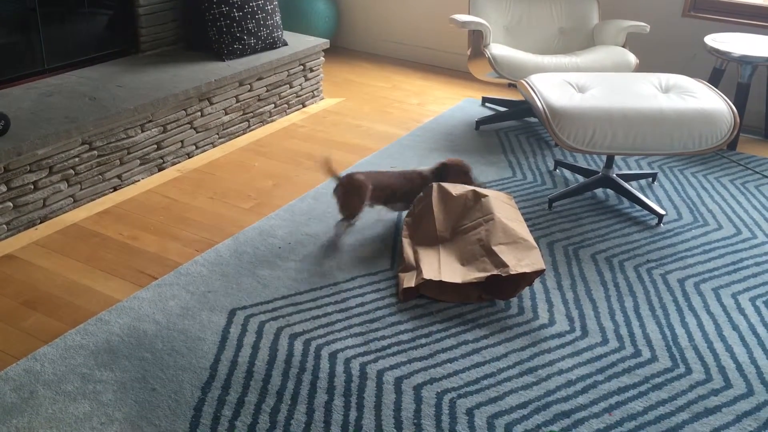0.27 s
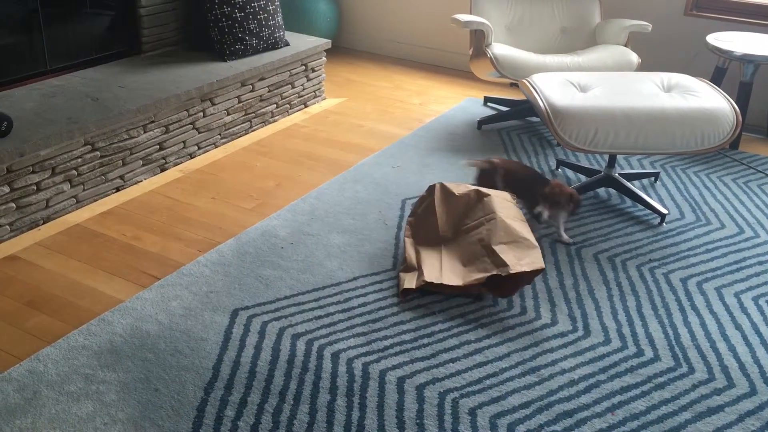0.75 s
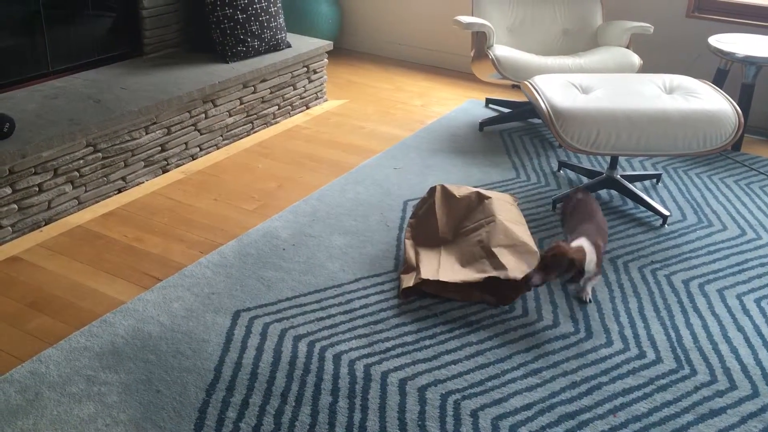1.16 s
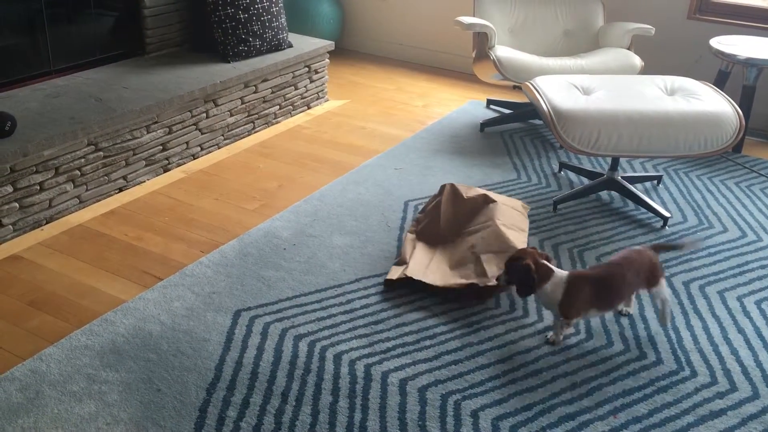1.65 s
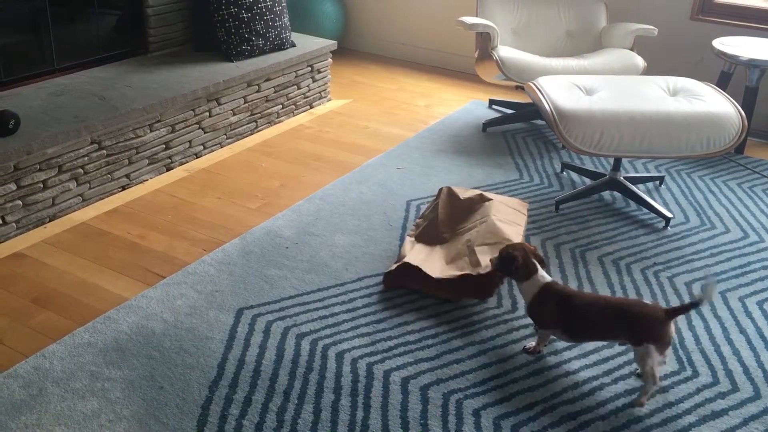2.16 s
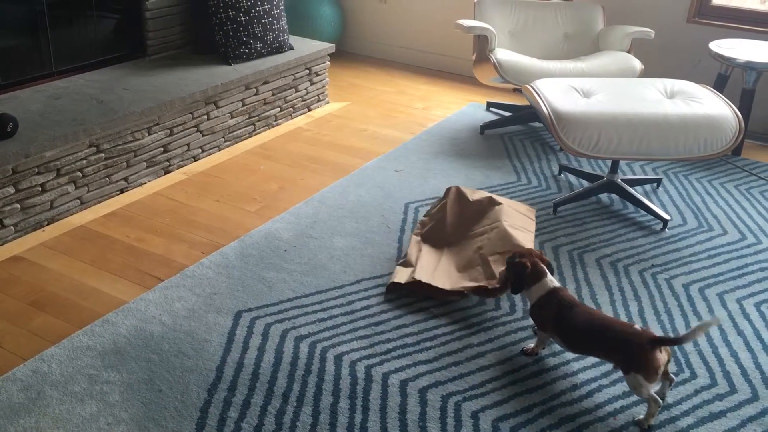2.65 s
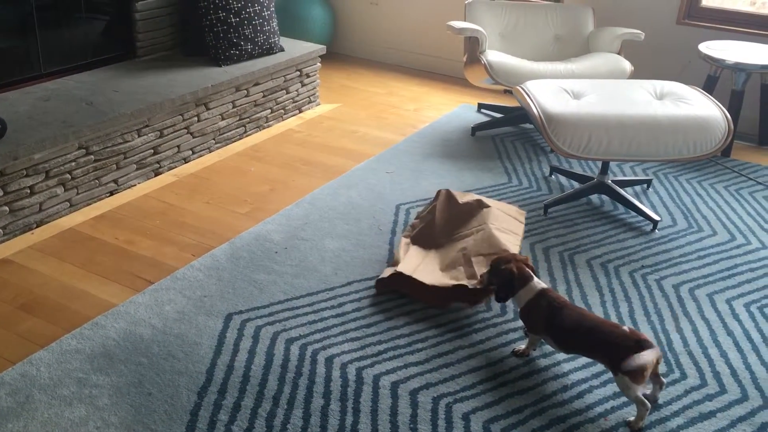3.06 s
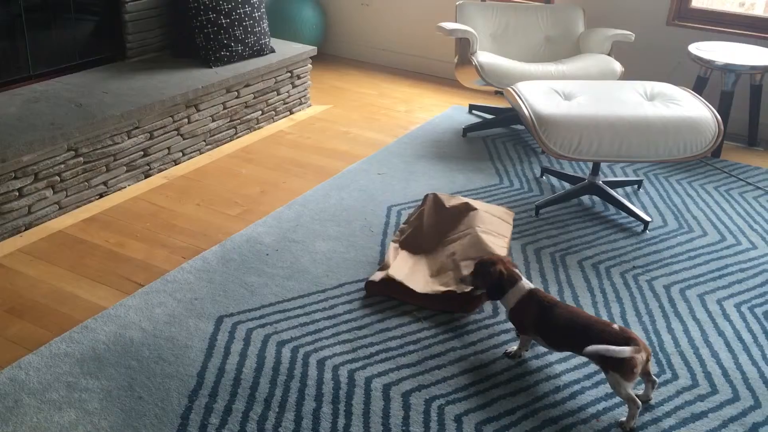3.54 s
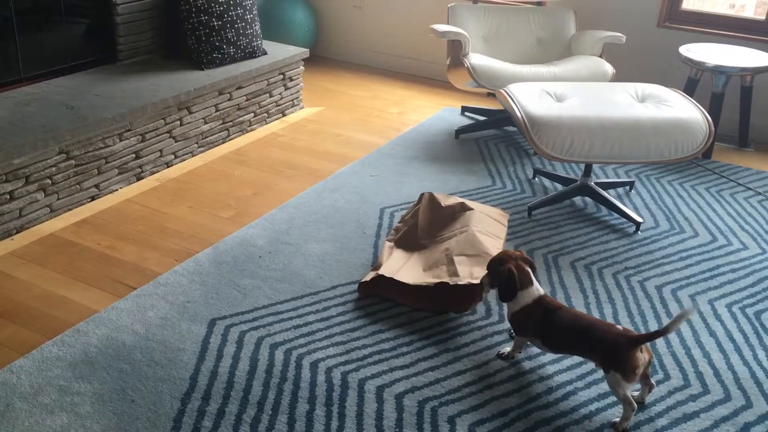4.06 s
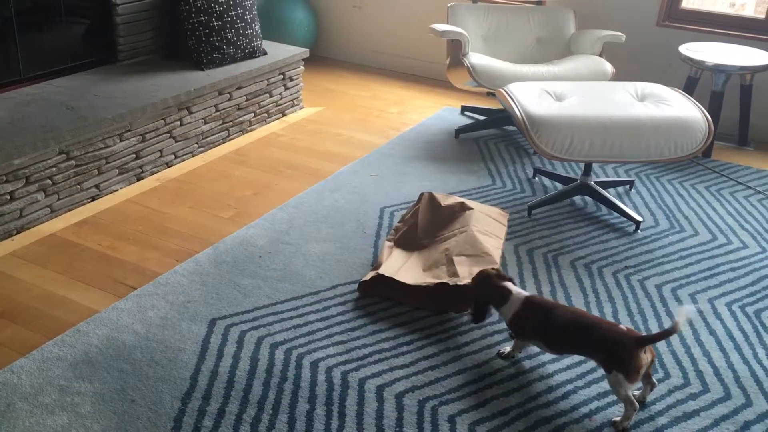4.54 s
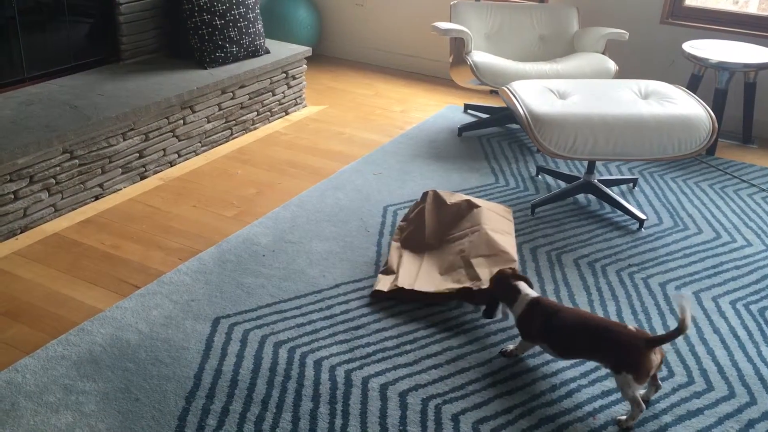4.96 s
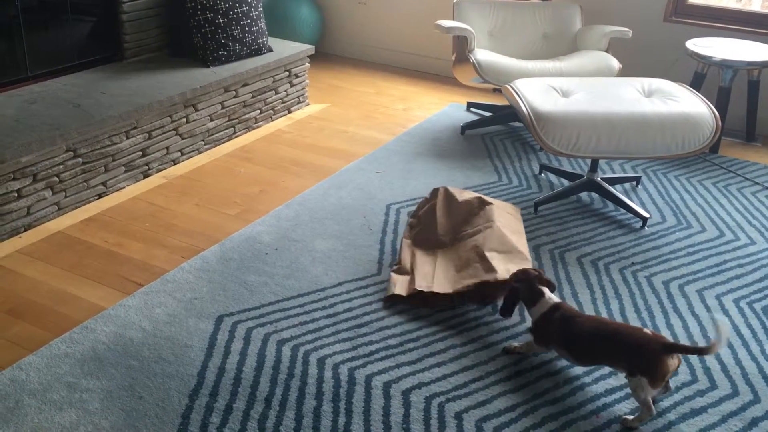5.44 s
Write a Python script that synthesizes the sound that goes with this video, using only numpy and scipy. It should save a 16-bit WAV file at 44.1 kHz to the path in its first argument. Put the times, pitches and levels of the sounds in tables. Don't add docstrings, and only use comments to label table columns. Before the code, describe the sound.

In a quiet, reverberant living room, a small puppy makes faint thin nose whistles, then one very loud, almost pure squealing yap under half a second in. Its ring throbs and fades while short nasal chirps follow. The puppy then shoves and bites a stiff paper bag: rustles, dragging hiss, hollow pops and sharp crackles, with soft paw thuds on the rug. A lull comes before a final bright burst of crunching. Mono phone microphone.

```python
import sys
import numpy as np
from scipy import signal
from scipy.io import wavfile
from scipy.ndimage import uniform_filter1d

SR = 44100
rng = np.random.default_rng(int(sys.argv[2]) if len(sys.argv) > 2 else 0)


def nominal_scale(level):
    x = np.asarray(level, float) / 20
    return 10 ** x


def output_pcm(signal):
    pcm = np.clip(np.atleast_2d(signal).T, -1, 1) * 32767
    wavfile.write(sys.argv[1], SR, np.round(pcm).astype(np.int16))


N = 251357

# centre in Hz, width in Hz, level in dB, t60 in seconds.
EARLIER_RING = [(1840, 70, -59.5, 1.1), (1660, 200, -63.5, 7.8), (880, 59, -64.5, 1.8)]
# frequency in Hz, level in dB per Hz.
HUSH_SPECTRUM = [(15, -60), (25, -20), (38, -15), (59, -4), (82, -10), (195, -16), (309, -21), (451, -28),
                 (1500, -37), (2840, -39), (16000, -45)]
HUSH_DB = -65

# peak in seconds, fizz in dB, body against the fizz in dB,
# rise in seconds, fall in seconds.
NUDGES = [(.001, -85, 10.5, 0.0093, 0.38), (0.222, -62.5, -3.5, 0.088, 0.15),
          (0.392, -63.5, -3, 0.018, 0.029), (.52, -60.5, 0.5, 0.092, 0.6), (.85, -68.5, -4, 0.21, 0.41),
          (1.18, -55.5, -11.5, 0.089, 0.33), (1.27, -64, 4, 0.1, 1), (1.64, -62.5, -3.5, 0.07, 0.61),
          (1.804, -55, 2, 0.0088, 0.24), (2.22, -58, -1.5, 0.26, 0.2), (2.5, -62.5, 1.5, 0.38, 0.088),
          (2.519, -54, 1, 0.029, 0.24), (2.712, -63, 1.5, 0.058, 0.62), (2.95, -65, 5.5, 0.066, 1),
          (3.68, -72, 8, 0.086, 0.19), (3.3, -55.5, -6, 0.063, 0.14), (3.371, -52.5, -5, 0.015, 0.35),
          (4.57, -70, -7, 0.02, 0.59), (4.722, -74, 11.5, 0.0034, 0.2), (4.757, -57.5, -3, 0.077, 0.26),
          (4.815, -61.5, -6, 0.035, 0.16), (5.217, -61, -1.5, 0.35, 0.42), (5.332, -52, 1.5, 0.025, 0.23),
          (5.562, -43, -9.5, 0.015, 0.051), (5.58, -54.5, -0.5, 0.023, 0.51)]
# frequency in Hz, level in dB per Hz.
FIZZ_SPECTRUM = [(1290, -26.5), (2200, -7.5), (3590, -2), (5090, -11.5), (5960, -7), (10300, -28),
                 (14000, -23), (16000, -46.5)]
# frequency in Hz, level in dB per Hz.
BODY_SPECTRUM = [(88, -34.5), (150, -4), (328, 0), (442, -4), (708, 1.5), (1690, -1.5), (4500, -17),
                 (5850, -51), (9900, -120)]
BODY_FALL_SHARE = 0.74

# time in seconds, deep thud in dB, knock in dB.
PAWS = [(.06, -79, -55.5), (.3, -47, -58.5), (0.521, -66, -44.5), (.73, -49.5, -49), (1.3, -57, -45),
        (1.67, -56.5, -52), (1.82, -54, -45), (2.2, -56.5, -52), (2.491, -63, -48), (2.95, -52, -45),
        (3.2, -58.5, -47), (3.569, -57.5, -50), (4.762, -66, -43.5), (5.2, -69.5, -47),
        (5.38, -50.5, -48.5), (5.638, -54.5, -44)]
# frequency in Hz, level in dB per Hz.
THUD_SPECTRUM = [(15, -34.5), (30, -16.5), (50, -3), (90, -2), (130, -5), (250, -44)]
# frequency in Hz, level in dB per Hz.
KNOCK_SPECTRUM = [(60, -25.5), (120, 2.5), (200, -1), (320, 0.5), (500, -12.5), (1000, -47.5)]
THUD_RISE_S, THUD_FALL_S, THUD_REST_DB = 0.2, 0.18, -67
KNOCK_RISE_S, KNOCK_FALL_S, KNOCK_REST_DB = 0.045, 0.44, -70

# start in seconds, length in seconds, from Hz, to #
# Hz, level in dB.
BLURRED_TONES = [
    (0.095, .09, 5130, 5210, -68),
    (.102, 0.035, 7380, 7500, -78.5),
    (0.3, .12, 4400, 5380, -66.5),
    (0.31, .14, 7600, 7400, -72),
    (0.363, .035, 6600, 7000, -64),
    (1.11, 0.038, 12200, 11500, -61),
    (0.27, .05, 1300, 1600, -49.5),
    (0.47, .05, 1420, 1380, -52),
    (1.6, 0.055, 1220, 1430, -52),
]
# start in seconds, length in seconds, from
# Hz, to # Hz, level in dB.
OPEN_WHISTLES = [
    (0.212, 0.011, 5640, 4950, -50),
    (0.218, 0.029, 5750, 5080, -58),
    (0.449, 0.032, 5870, 6550, -40.5),
    (1.105, 0.034, 4980, 5400, -46.5),
    (1.185, .025, 5260, 5040, -49.5),
    (1.183, 0.023, 15800, 14300, -58),
]
# start in seconds, length in seconds, from Hz, to Hz, level in dB.
PINCHED_WHISTLES = [
    (.108, 0.048, 5040, 5100, -64.5),
    (.219, 0.021, 4840, 4750, -56),
    (.394, 0.026, 6430, 6500, -50.5),
    (1.156, 0.017, 5580, 5460, -43),
    (1.166, 0.017, 5435, 5650, -39.5),
    (1.179, 0.032, 5480, 4590, -50),
]
BLURRED_DB = [0, -28, -39]
OPEN_DB = [2, -17.5, -34]
PINCHED_DB = [-9, 6, -23.5]
WHISTLE_ENDS_DB = -11.5
CLEAR_BLUR, FULL_BLUR = 0.25, 1

# full from in seconds, full until in seconds, level in dB,
# rise in seconds, fall in seconds.
DRAGS = [(.21, .225, -61, 0.088, 0.088), (.385, .39, -76, 0.037, 0.0081), (.55, 1.005, -71.5, 0.043, .02),
         (1.16, 1.2, -63, .023, .045), (1.26, 1.32, -67, .02, .05), (1.39, 1.72, -60, 0.11, 0.029),
         (1.88, 1.905, -62, 0.13, 0.087), (2.085, 2.095, -68, 0.084, 0.057), (2.175, 2.19, -61, .05, 0.071),
         (2.58, 2.65, -69, .23, .1), (2.7, 2.72, -60, 0.19, 0.029), (2.93, 3.28, -71, .085, 0.13),
         (3.29, 3.3, -62, 0.017, 0.4), (3.555, 3.565, -77.5, 0.084, 0.029),
         (4.75, 4.765, -59.5, 0.034, 0.1), (4.81, 4.83, -62, 0.019, 0.087), (4.7, 5.31, -71, 0.23, 0.052),
         (5.34, 5.348, -47, 0.02, 0.05), (5.56, 5.7, -57, 0.013, 0.045)]
# frequency in Hz, level in dB per Hz.
PILE_SPECTRUM = [(1500, -22.5), (3000, -6.5), (6000, -5), (9000, -4), (10500, -10), (12000, -5),
                 (15500, -14)]

# time in seconds, peak in dB, ring in Hz, burst t60 in seconds.
POPS = [(.218, -41, 1500, 0.04), (2.469, -43, 1500, 0.016), (4.722, -38, 900, 0.0091),
        (1.251, -39, 2600, 0.034), (2.164, -31, 1253, 0.035), (2.203, -28, 857, 0.05),
        (2.47, -32, 1420, 0.061), (2.515, -27.5, 1210, 0.014), (2.522, -29, 2340, 0.039),
        (2.552, -32, 1600, 0.02), (2.722, -35, 1020, 0.031), (2.734, -33.5, 1190, 0.028),
        (2.751, -31.5, 1420, 0.017), (2.803, -35, 1280, 0.0042), (2.924, -39, 2400, 0.015),
        (2.938, -27.5, 1270, 0.038), (3.106, -28, 1170, 0.042), (3.138, -31.5, 1190, 0.014),
        (3.163, -38.5, 1650, 0.013), (3.371, -50.5, 1570, .02), (3.39, -47, 1156, 0.024),
        (3.4261, -22.5, 1245, 0.0078), (3.45, -33.5, 1400, 0.0098), (3.052, -29.5, 810, 0.016),
        (4.589, -51, 2100, 0.01), (4.678, -40, 800, 0.02), (5.082, -34, 1650, 0.028),
        (5.599, -32, 3060, 0.032), (5.152, -33.5, 1070, 0.014), (5.163, -33.5, 1660, 0.02),
        (5.308, -31, 1220, 0.011), (5.333, -32, 925, 0.014), (5.439, -29.5, 1326, 0.015),
        (5.596, -23.5, 880, 0.065)]
POP_CRACK_DB, CRACK_DB_PER_S = -33, 420
POP_BOOM_DB = -32.5
# time in seconds, peak in dB, ring in Hz.
BUCKLES = [(1.433, -36, 3220), (1.761, -38, 1150), (1.806, -27, 1250), (1.837, -29.5, 1120),
           (2.084, -37, 1650), (2.381, -36, 855), (2.446, -38.5, 1100), (2.499, -50, 1730),
           (2.986, -35, 1930), (3.261, -37.5, 3380), (3.666, -40.5, 878), (3.699, -34.5, 2150),
           (4.723, -39, 810), (4.827, -35, 983), (5.128, -35.5, 975), (5.348, -29, 1040)]
BUCKLE_CRACK_DB, BUCKLE_BOOM_DB, BUCKLE_S = -37, -5.5, 0.024
# time in seconds, peak in dB, ring in Hz, bright crack in dB.
CRACKS = [(.605, -46, 4470, -35), (1.054, -71, 5700, -64), (1.261, -31, 3400, -41), (3.291, -38, 2010, -31),
          (3.362, -29.5, 1364, -29.5), (4.753, -40, 1165, -37), (4.81, -38, 752, -36),
          (5.223, -55, 2500, -32), (5.297, -47, 4300, -39), (5.326, -32, 3980, -38),
          (5.333, -25, 3800, -28), (5.343, -53, 2430, -24.5), (5.555, -31.5, 3300, -25),
          (5.561, -29, 6060, -25.5), (5.576, -26, 1760, -26.5)]
CRACK_BOOM_DB, CRACK_S = -20, 0.022
# time in seconds, peak in dB, frequency in Hz.
TICKS = [(1.054, -64, 5800), (1.633, -43, 7800), (2.5, -46, 5000), (3.0433, -45, 3760), (3.094, -43, 5800),
         (3.3128, -34, 5800), (3.318, -40, 5420), (3.372, -37, 5200), (3.3946, -53, 4520),
         (3.4526, -32, 3100), (5.1533, -48, 4030), (5.25, -47, 6060)]
# time in seconds, peak in dB, frequency in Hz.
BUMPS = [(1.812, -27.5, 283), (1.847, -35.5, 332), (1.867, -33, 305), (1.965, -43, 338),
         (2.191, -37.5, 278), (2.491, -33.5, 278), (3.051, -36, 216), (3.081, -31.5, 520), (3.55, -36, 129),
         (3.95, -48, 416.6), (4.048, -44, 340.6), (4.727, -33, 299), (4.735, -37, 148), (4.764, -44, 164.4),
         (4.827, -43, 146), (5.259, -31.5, 270), (5.559, -37, 231)]
TICK_CYCLES, BUMP_CYCLES = 31, 8.4

# time in seconds, tone in dB.
YAP_EFFORT = [
    (.397, -44),
    (.404, -45.5),
    (.411, -8.5),
    (.428, -10.5),
    (.447, -7),
    (.457, -15),
    (.472, -20),
    (.492, -16),
    (.518, -55.5),
]
# time in seconds, pitch in Hz.
YAP_PITCH = [
    (.397, 1804),
    (.409, 1859),
    (.416, 1892),
    (.426, 1909),
    (.44, 1895),
    (.456, 1930),
    (.474, 2000),
    (.489, 1824),
    (.504, 1694),
]
# full from in seconds, full until in seconds, level in dB, rise and fall in seconds.
SECOND_PARTIAL = (.416, .46, -20.5, .008, .022)
THIRD_PARTIAL = (.411, .476, -37.5, .005, .012)
UPPER_PARTIALS = (.408, .445, 7.5, .006, .045)
HALF_PITCH = (.447, .459, -33, .02, .028)
THROAT_AIR = (.462, .488, -35, .075, .024)
UPPER_DB = [-54, -57, -60, -56, -66]
# frequency in Hz, level in dB per Hz.
RASP_SPECTRUM = [(1410, -83.5), (2400, -52.5), (2550, -25), (3520, -19), (3860, -8.5), (4280, -28),
                 (5930, -24.5), (6880, -23.5), (15500, -28)]

# time in seconds, peak in dB.
SPITS = [(1.6303, -41), (1.76, -49), (1.7929, -39), (1.8029, -44), (1.8373, -46), (2.0823, -50),
         (2.1611, -40), (2.2031, -38), (2.4694, -47), (2.4993, -44), (2.5233, -44), (2.5233, -42),
         (2.6096, -49), (2.7208, -44), (2.9239, -55), (2.9388, -34), (2.9874, -43), (3.0476, -46),
         (3.0935, -50), (3.105, -53), (3.2591, -58), (3.291, -44), (3.312, -39), (3.3609, -33),
         (3.4247, -45), (3.6991, -50), (4.7397, -50.5), (4.7512, -46.5), (4.8081, -44), (5.084, -54),
         (5.1259, -47), (5.154, -33), (5.2206, -39), (5.294, -46), (5.332, -33), (5.332, -32), (5.438, -43),
         (5.5604, -40), (5.562, -24), (5.5968, -41)]
SPIT_T60_S = 0.0042

# frequency in Hz, t60 in seconds.
ROOM_T60 = [(100, 0.99), (300, 1.73), (1000, 1.45), (2000, 1.39), (4000, 0.73), (6000, 0.57), (9000, 0.71),
            (14000, 0.36)]
# delay in seconds, level in dB.
WALLS = [(.004, -14), (.009, -16), (.015, -16), (.026, -12), (.035, -15)]
# frequency in Hz, level in dB.
BAG_ROOM_DB = [(200, -3), (1000, -2.5), (2000, -2), (4000, -6), (8000, -5.5), (14000, -9)]
# frequency in Hz, level in dB.
VOICE_ROOM_DB = [(200, -1), (1000, 0), (1750, 0), (2100, 1), (4000, -7.5), (8000, -3.5), (11000, -11),
                 (14000, -8.5)]
# frequency in Hz, level in dB.
STANDING = [(3812, -62), (3835, -66), (3868, -67), (3895, -62), (3925, -66), (953, -60), (966, -65),
            (984, -62), (5717, -63), (7800, -54)]
STANDING_RING = 1.6
# frequency in Hz, level in dB, sign at the mic.
BEATING = [(1847.2, -55.6, 1), (1859.6, -59.6, -1), (1862.0, -65.6, -1), (1880.0, -57.5, 1),
           (1885.6, -58.5, -1), (1888.8, -63.0, 1), (1890.4, -58.9, -1), (1893.2, -64.6, 1),
           (1895.2, -72.9, 1), (1896.8, -60.3, -1), (1898.4, -62.6, -1), (1901.6, -64.0, 1),
           (1903.6, -63.5, 1), (1905.6, -70.0, -1), (1909.2, -66.9, 1), (1910.8, -69.7, 1),
           (1913.2, -66.1, 1), (1916.4, -67.1, 1), (1918.4, -56.7, 1), (1920.0, -61.8, 1),
           (1922.4, -56.5, -1), (1924.0, -61.9, -1), (1927.6, -55.6, -1), (1929.6, -57.1, -1),
           (1931.6, -60.1, -1), (1936.4, -61.1, -1), (1938.0, -51.6, -1), (1939.6, -55.2, -1),
           (1941.2, -64.5, -1), (1943.6, -60.3, -1), (1945.2, -58.8, -1), (1948.0, -57.2, -1),
           (1950.4, -65.7, 1), (1954.4, -65.1, -1), (1956.0, -56.7, 1), (1959.2, -52.0, 1),
           (1961.2, -59.3, 1), (1963.6, -47.7, 1), (1966.4, -46.0, 1), (1968.4, -49.6, 1),
           (1970.4, -59.6, 1), (1972.4, -47.8, 1), (1976.0, -57.8, 1), (1978.0, -59.2, 1),
           (1980.0, -50.1, 1), (1981.6, -55.8, 1), (1983.2, -60.5, -1), (1990.0, -57.1, -1),
           (1994.4, -50.7, 1), (1996.0, -52.8, 1)]
BEATING_DB, BEATING_T60_S, BEATING_ENDS_S = 1.5, 1.442, 0.9
# from Hz, to Hz.
SPARSE = [(1840, 2025), (925, 1010)]
SPARSE_SHARE = 0.7
# from Hz, to Hz, margin in dB.
DROWNED = [(2150, 2240, 48), (2240, 2410, 42), (2410, 2580, 32), (2580, 2760, 44), (2760, 2930, 47)]


def evened(x):
    return x / np.sqrt(np.mean(x ** 2) + 1e-20)


def read(points, hz):
    f, value = np.transpose(points)
    return np.interp(np.log(hz + 1), np.log(f + 1), value)


def add(mix, s, sound):
    part = mix[round(s * SR):][:len(sound)]
    part += sound[:len(part)]


def colour(x, points):
    hz = np.abs(np.fft.fftfreq(8192, 1 / SR))
    log_gain = np.log(nominal_scale(np.maximum(read(points, hz), -100)))
    minimum_phase = np.exp(np.conj(signal.hilbert(log_gain)))
    taps = np.fft.ifft(minimum_phase).real[:4096]
    return evened(signal.oaconvolve(x, taps)[:len(x)])


def bandpass(x, order, low_hz, high_hz):
    return signal.lfilter(*signal.butter(order, [low_hz, high_hz], "band", fs=SR), x)


def drift(size, hz):
    span = int(SR / hz)
    once = uniform_filter1d(rng.standard_normal(size), span)
    return evened(uniform_filter1d(once, span))


def swell(t, rows):
    full_s, until_s, db, rise_s, fall_s = np.transpose(rows)[:, :, None]
    before = (full_s - t) / np.maximum(rise_s, .002)
    after = (t - until_s) / np.maximum(fall_s, .002)
    away = np.maximum(np.maximum(before, after), 0)
    return np.sqrt((nominal_scale(db - 20 * away) ** 2).sum(0))


def gestures(rows):
    t = np.arange(0, N + 64, 64) / SR
    return np.interp(np.arange(N) / SR, t, swell(t, rows))


def hush():
    return nominal_scale(HUSH_DB) * colour(rng.standard_normal(N), HUSH_SPECTRUM)


def earlier_yap():
    t = np.arange(N) / SR
    out = np.zeros(N)
    for hz, width, db, t60 in EARLIER_RING:
        fading = nominal_scale(db - 60 * t / t60) * np.sqrt(2)
        out += fading * drift(N, width) * np.sin(2 * np.pi * hz * t)
    return out


def crackle(size, per_s, spread_db):
    large = nominal_scale(spread_db * np.minimum(rng.exponential(1, size), 4))
    return large * rng.standard_normal(size) * (rng.random(size) < per_s / SR)


def rustle():
    clumps = nominal_scale(2.3 * drift(N, 120))
    fizz = colour(crackle(N, per_s=6200, spread_db=1.5) * clumps, FIZZ_SPECTRUM)
    body = colour(crackle(N, per_s=5000, spread_db=2.2) * clumps, BODY_SPECTRUM)
    s, fizz_db, body_db, rise_s, fall_s = np.transpose(NUDGES)
    fizz_gain = gestures(np.transpose([s, s, fizz_db + 0.5, rise_s, fall_s]))
    body_fall_s = BODY_FALL_SHARE * fall_s
    body_gain = gestures(np.transpose([s, s, fizz_db + body_db + 9.0, rise_s, body_fall_s]))
    return fizz_gain * fizz + body_gain * body


def paws():
    thud_rows = [(s, s, db, THUD_RISE_S, THUD_FALL_S) for s, db, _ in PAWS]
    knock_rows = [(s, s, db, KNOCK_RISE_S, KNOCK_FALL_S) for s, _, db in PAWS]
    thud_gain = nominal_scale(-3.5) * (nominal_scale(THUD_REST_DB) + gestures(thud_rows))
    knock_gain = nominal_scale(KNOCK_REST_DB) + gestures(knock_rows)
    lumps = nominal_scale(-6.5 + 2.2 * drift(N, 30))
    thud = thud_gain * colour(rng.standard_normal(N), THUD_SPECTRUM)
    return thud + knock_gain * lumps * colour(rng.standard_normal(N), KNOCK_SPECTRUM)


def whistle(s, length, from_hz, to_hz, db, partials_db, breath):
    u = np.arange(0, length, 1 / SR) / length
    hz = from_hz + (to_hz - from_hz) * u
    turn = 2 * np.pi * np.cumsum(hz * (1 + 0.0027 * drift(len(hz), 400))) / SR
    tone = np.zeros(len(hz))
    for k, partial_db in enumerate(partials_db, 1):
        tone += nominal_scale(partial_db) * np.sin(k * turn) * (k * hz < 16000)
    tone *= 1 - breath + breath * drift(len(hz), 700)
    arch_db = db + WHISTLE_ENDS_DB * (2 * u - 1) ** 2
    level = nominal_scale(arch_db + 0.72 * drift(len(hz), 200))
    return s, np.sqrt(2) * tone * level * signal.windows.tukey(len(hz), .15)


def nose_whistles():
    out = np.zeros(N)
    for row in BLURRED_TONES:
        add(out, *whistle(*row, BLURRED_DB, FULL_BLUR))
    for row in OPEN_WHISTLES:
        add(out, *whistle(*row, OPEN_DB, CLEAR_BLUR))
    for row in PINCHED_WHISTLES:
        add(out, *whistle(*row, PINCHED_DB, CLEAR_BLUR))
    return out


def drag():
    flicker = nominal_scale(-4.0 + 1.5 * drift(N, 120))
    return gestures(DRAGS) * flicker * colour(rng.standard_normal(N), PILE_SPECTRUM)


def snap(s, peak_db, ring_hz, crack_db, boom_db, burst_s):
    t = np.arange(3000) / SR
    noise = rng.standard_normal((4, len(t)))
    burst_s = np.clip(burst_s, .005, .12)
    ring_gain = nominal_scale(-60 * t / 0.011 - 150 * burst_s) * np.minimum(t / 0.0004, 1)
    ring = ring_gain * np.sin(2 * np.pi * ring_hz * t)
    cluster_db = 2.2 * uniform_filter1d(noise[3], 30) * np.sqrt(30)
    burst = nominal_scale(-60 * t / burst_s + cluster_db) * (1 - np.exp(-t / (0.04 * burst_s)))
    panel = bandpass(noise[0], 2, ring_hz, ring_hz + 3500) * burst * nominal_scale(-4.0)
    crack = bandpass(noise[1], 2, 3500, 11000) * burst * nominal_scale(-4.0 - 60 * t / 0.018)
    boom = bandpass(noise[2], 2, 180, 700) * nominal_scale(-60 * t / 0.12 + 7.0)
    return s - .0008, nominal_scale(peak_db) * (ring + panel) + nominal_scale(crack_db) * crack + nominal_scale(boom_db) * boom


def ping(s, peak_db, hz, cycles, rough):
    turns = np.arange(3000) * hz / SR
    shape = np.minimum(turns / 1.55, 1) * nominal_scale(-60 * turns / cycles + 0.5)
    return s, nominal_scale(peak_db) * shape * np.sin(2 * np.pi * turns) * (1 + rough * drift(len(turns), hz))


def creases():
    out = np.zeros(N)
    for s, db, hz, burst_s in POPS:
        crack_db = db + POP_CRACK_DB + CRACK_DB_PER_S * burst_s
        add(out, *snap(s, db, hz, crack_db, db + POP_BOOM_DB, burst_s))
    for s, db, hz in BUCKLES:
        add(out, *snap(s, db, hz, db + BUCKLE_CRACK_DB, db + BUCKLE_BOOM_DB, BUCKLE_S))
    for s, db, hz, crack_db in CRACKS:
        add(out, *snap(s, db, hz, crack_db, db + CRACK_BOOM_DB, CRACK_S))
    for row in TICKS:
        add(out, *ping(*row, TICK_CYCLES, rough=0.46))
    for row in BUMPS:
        add(out, *ping(*row, BUMP_CYCLES, rough=0.12))
    return out


def yap():
    effort_s, effort_db = np.transpose(YAP_EFFORT)
    start_s = effort_s[0]
    steps = np.arange(start_s, effort_s[-1], 1 / SR)
    tone_db = np.interp(steps, effort_s, effort_db)
    t = start_s + np.arange(len(tone_db)) / SR
    hz = np.interp(t, *np.transpose(YAP_PITCH))
    turn = 2 * np.pi * np.cumsum(hz * (1 + .0001 * drift(len(hz), 300))) / SR
    gains = [nominal_scale(tone_db), swell(t, [SECOND_PARTIAL]), swell(t, [THIRD_PARTIAL])]
    gains += [swell(t, [UPPER_PARTIALS]) * nominal_scale(tone_db + db) for db in UPPER_DB]
    squeal = np.zeros(len(t))
    for k, gain in enumerate(gains, 1):
        squeal += uniform_filter1d(gain, size=200) * np.sin(k * turn)
    uneven = 1 + 3 * drift(len(hz), 550)
    half = np.sin(turn / 2) + nominal_scale(-17.5) * uneven * np.sin(3 * turn / 2)
    half *= swell(t, [HALF_PITCH])
    pulsed_air = rng.standard_normal(len(hz)) * (1 + .5 * np.cos(turn))
    rasp = swell(t, [THROAT_AIR]) * colour(pulsed_air, RASP_SPECTRUM)
    return start_s, (np.sqrt(2) * (squeal + half) + rasp) * signal.windows.tukey(len(hz), .05)


def spits():
    out = np.zeros(N)
    t = np.arange(600) / SR
    for s, db in SPITS:
        add(out, s, nominal_scale(db - 10.5 - 60 * t / SPIT_T60_S) * rng.standard_normal(len(t)))
    return bandpass(out, 1, 3000, 9000)


def room(x, strength, standing=(), beating=(), sparse=()):
    hz, t, z = signal.stft(rng.standard_normal(2 * SR), SR, nperseg=256)
    band_db = read(strength, hz)[:, None] - 60 * t / read(ROOM_T60, hz)[:, None]
    tail = signal.istft(z * nominal_scale(band_db), SR, nperseg=256)[1]
    t = np.arange(len(tail)) / SR
    tail *= nominal_scale(-25.0)
    for edges in sparse:
        band = signal.butter(3, edges, "band", fs=SR, output="sos")
        tail -= SPARSE_SHARE * signal.sosfiltfilt(band, tail)
    for hz, db in standing:
        waver = 1 + .4 * drift(len(t), 40)
        fading = nominal_scale(db - 60 * t / read(ROOM_T60, hz) / STANDING_RING)
        tail += fading * waver * np.sin(2 * np.pi * hz * t)
    beating_age = t + np.maximum(t - BEATING_ENDS_S, 0)
    for hz, db, sign in beating:
        fading = nominal_scale(db + BEATING_DB - 60 * beating_age / BEATING_T60_S)
        tail += sign * fading * np.sin(2 * np.pi * hz * t)
    tail *= np.clip((t - .012) / .045, 0, 1)
    for k, (s, db) in enumerate(WALLS):
        tail[round(s * SR)] += (-1) ** k * nominal_scale(db)
    return signal.fftconvolve(x, tail)[:N]


def scene():
    puppy = nose_whistles()
    add(puppy, *yap())
    bag = rustle() + drag() + creases() + spits()
    puppy_room = room(nominal_scale(-9) * puppy, VOICE_ROOM_DB, STANDING, BEATING, SPARSE)
    bag_room = room(nominal_scale(-7.5) * bag, BAG_ROOM_DB)
    mix = puppy + nominal_scale(3.0) * bag + puppy_room + bag_room + paws() + earlier_yap() + hush()
    return mix[None]


def masked(x):
    hz, _, z = signal.stft(x, SR, nperseg=2048)
    tone = abs(z[0, (hz > 1700) & (hz < 2100)]).max(0)
    tone = np.minimum(tone, np.roll(tone, 1))
    for from_hz, to_hz, margin_db in DROWNED:
        margin_db = margin_db + 3 * rng.standard_normal(len(tone))
        band = (hz > from_hz) & (hz <= to_hz)
        drowned = tone > nominal_scale(margin_db) * abs(z[0, band]).max(0)
        z[0] *= 1 - .98 * band[:, None] * drowned
    return signal.istft(z, SR, nperseg=2048)[1][:, :N]


def top_cut(x):
    return signal.sosfilt(signal.butter(12, 16460, fs=SR, output="sos"), x)


def record(dry):
    held = 1.76 * np.tanh(dry / 1.657)
    edge = signal.firwin(511, 15850, window=("kaiser", 6), fs=SR)
    mix = signal.oaconvolve(masked(held), edge[None], "same")
    return top_cut(mix)


dry = scene()
out = record(dry)
output_pcm(out)
```